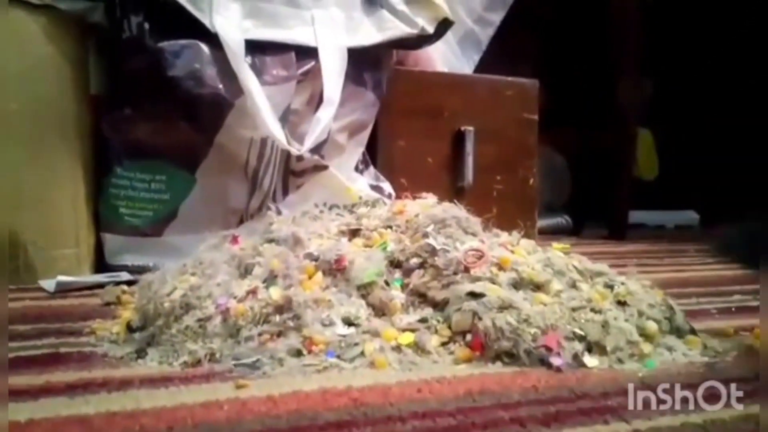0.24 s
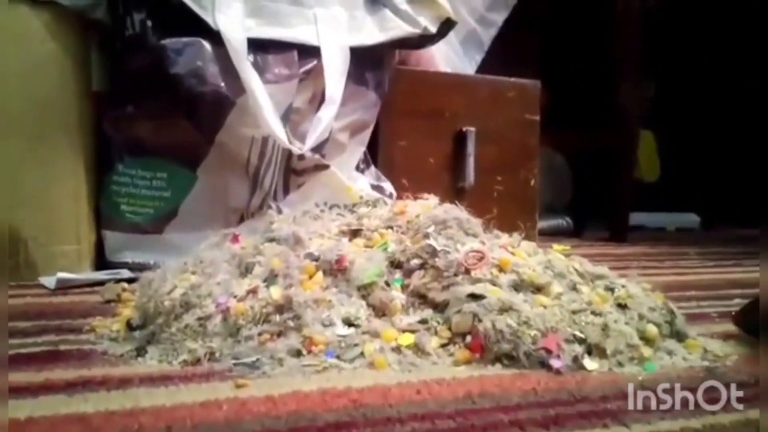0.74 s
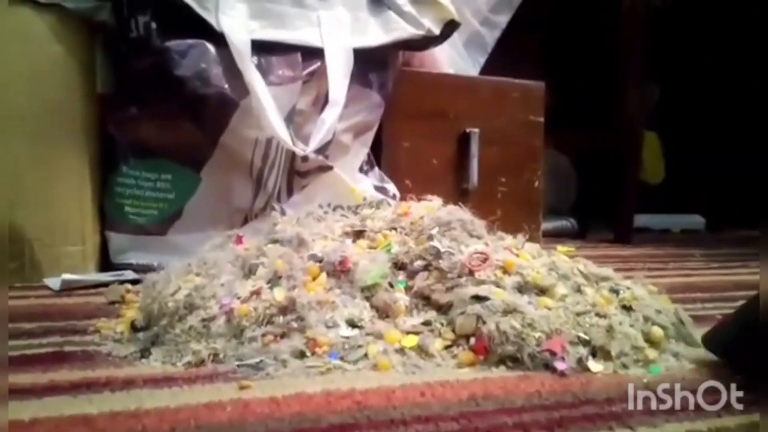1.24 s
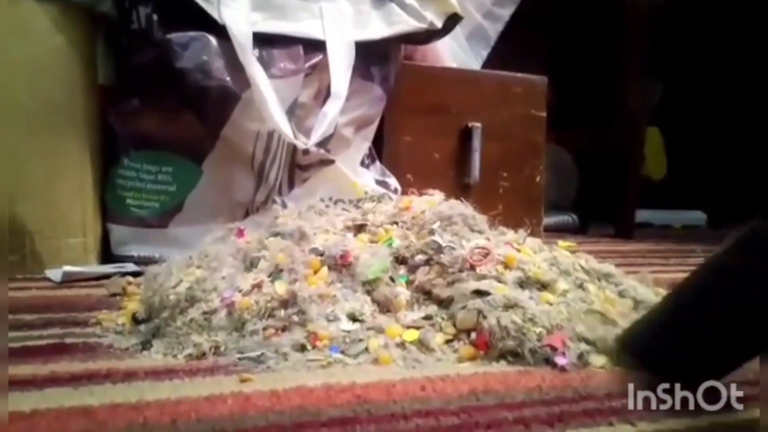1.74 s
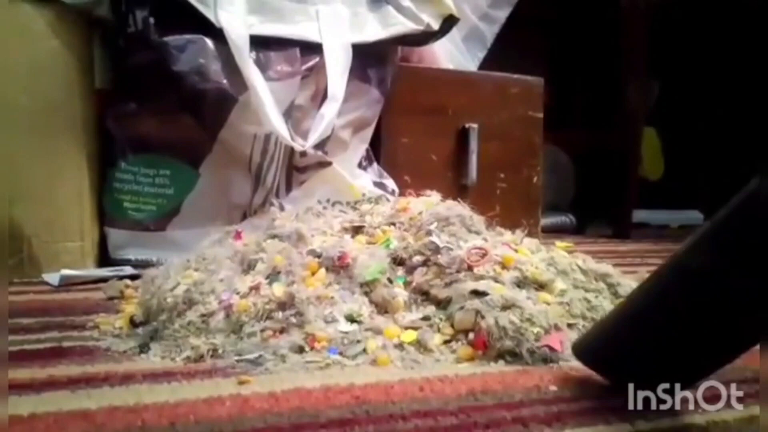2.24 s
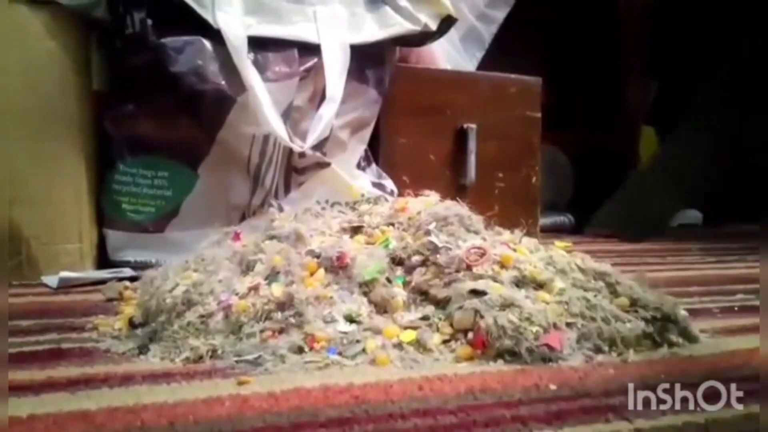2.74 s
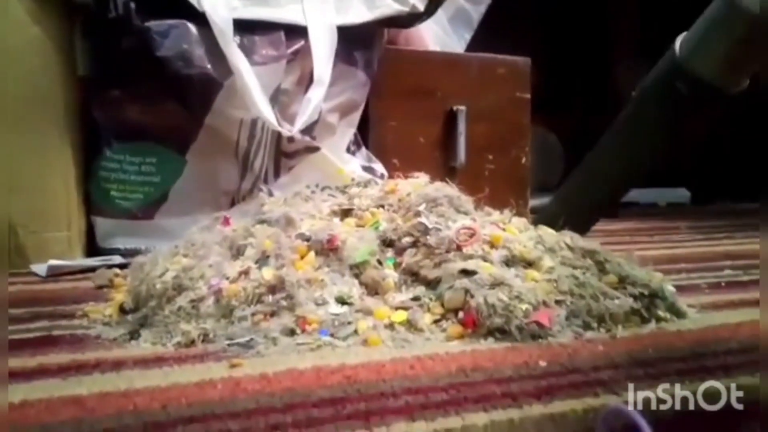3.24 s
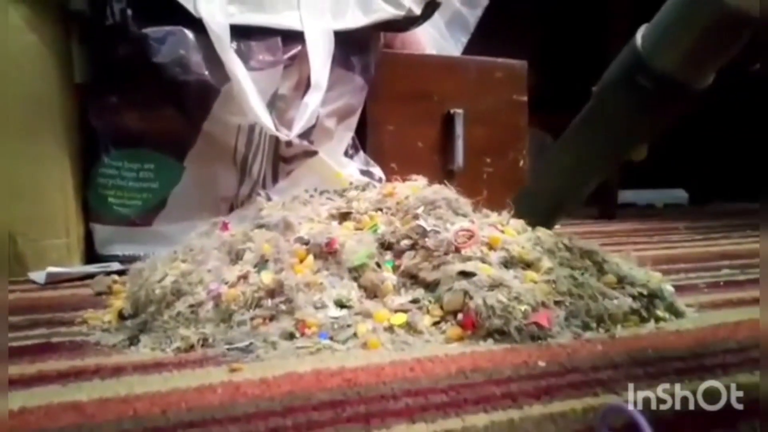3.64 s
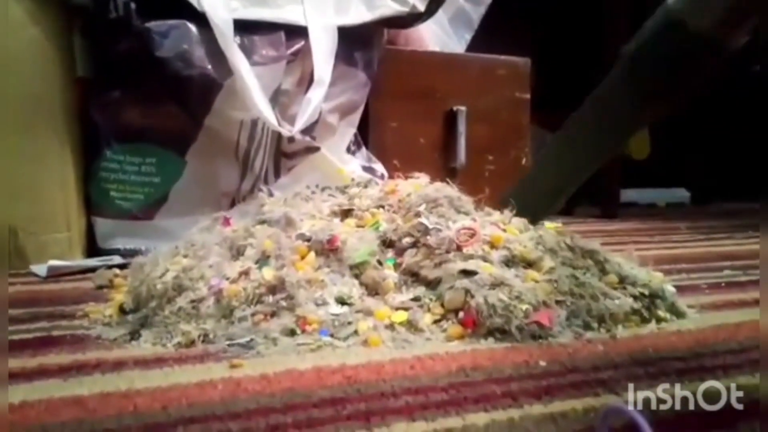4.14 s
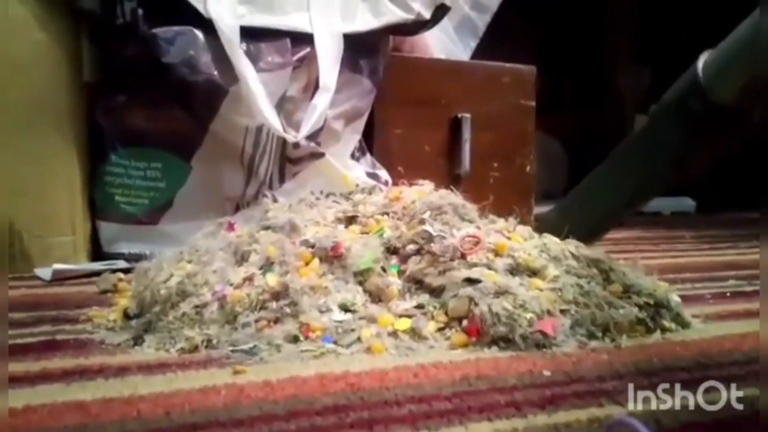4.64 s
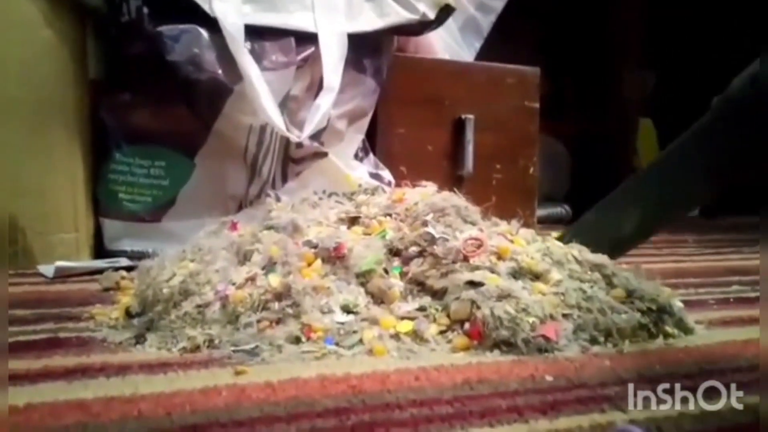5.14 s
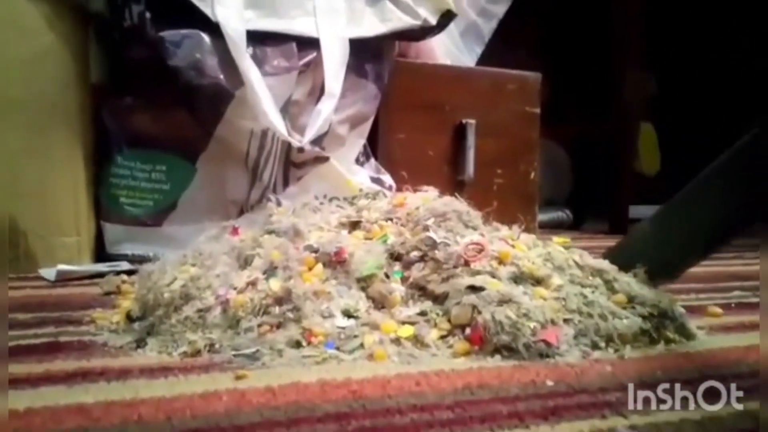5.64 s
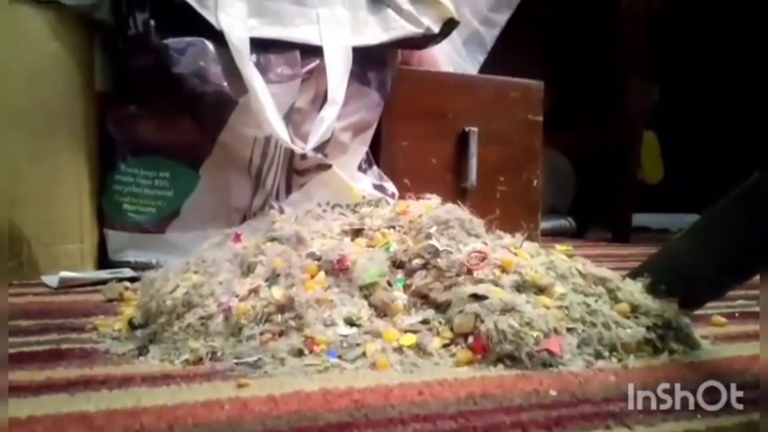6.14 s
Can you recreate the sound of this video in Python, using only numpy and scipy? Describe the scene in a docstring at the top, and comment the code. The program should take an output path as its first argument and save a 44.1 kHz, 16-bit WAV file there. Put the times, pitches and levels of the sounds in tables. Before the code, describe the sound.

A vacuum cleaner sucks debris off a carpet close up, with rushing air, fizzing grit and hard kernels rattling up the plastic wand.

```python
"""Vacuuming a carpet, close up

The wand works close by, to the right of a two-port microphone, sucking up fluff and hard kernels.
Air hums in the modes of the hose and swells as the nozzle gulps clumps. Grit fizzes and kernels tick
against the plastic wand, and lumps knock in the nozzle. Farther off, the motor hisses and whines."""
import sys
import numpy as np
from scipy import signal
from scipy.io import wavfile
from scipy.ndimage import uniform_filter1d

SR = 44100
rng = np.random.default_rng(int(sys.argv[2]) if len(sys.argv) > 2 else 0)


def generate_wav(signal):
    """Clip the signal to [-1, 1] and save it as 16-bit WAV at the path in sys.argv[1]."""
    frames = np.transpose(np.atleast_2d(signal))
    scaled = np.clip(frames, -1, 1) * 32767
    pcm = np.round(scaled).astype(np.int16)
    wavfile.write(sys.argv[1], SR, pcm)


N = 281358

# steady suction in the hose: time_s, level_db
SUCTION = [(0.0, -41), (0.15, -44), (0.7, -45.5), (1.15, -44), (1.5, -48.5), (1.7, -52.5), (2.05, -45.5),
           (2.45, -54), (2.66, -41), (2.87, -45.5), (3.67, -45.5), (4.5, -50.5), (5.05, -45), (5.45, -45),
           (5.6, -51), (5.82, -55), (6.1, -46), (6.38, -58)]
# clumps gulped by the nozzle: peak_s, fall_s, air_db, first_mode_db, second_mode_db
GULPS = [(0.0, 0.073, -50, -54, -46), (.724, 0.015, -30, -67, -38), (.952, 0.063, -43, -45, -43.5),
         (1.144, 0.043, -43, -48, -59), (1.58, 0.085, -41.5, -47, -47), (1.953, 0.031, -39, -37, -67),
         (2.272, 0.038, -41.5, -58, -68), (2.359, 0.032, -38, -43, -58), (2.489, 0.18, -35, -44, -44),
         (3.772, 0.022, -33, -29, -29), (3.893, 0.12, -43.5, -46.5, -55), (4.269, 0.024, -39.5, -49, -47),
         (4.372, 0.032, -41, -46, -55), (4.44, 0.045, -46, -39.5, -42.5), (4.489, 0.13, -43.5, -47, -47.5),
         (4.585, 0.024, -35, -39.5, -41.5), (5.155, 0.078, -71, -28.5, -41), (5.26, 0.066, -45, -48, -44),
         (6.105, 0.065, -64, -47, -72), (6.154, 0.024, -37, -65, -70), (6.251, 0.049, -45.5, -38, -44)]
# brief dips in the level of air and debris noise: centre_s, half_length_s, change_db
DIPS = [(0.649, 0.012, -9), (0.819, 0.056, -5.5), (1.235, 0.029, -2.5), (1.307, 0.01, -8),
        (1.482, 0.025, -8), (1.806, 0.043, -7), (2.035, 0.015, -6), (2.106, 0.056, -12), (2.296, 0.018, -4),
        (3.956, 0.012, -7), (4.007, 0.1, -5), (4.195, 0.039, -17), (4.307, 0.015, -6), (4.332, 0.026, -8),
        (4.605, 0.064, -3.5), (4.638, 0.012, -9), (4.727, 0.052, -5), (4.836, 0.01, -9), (5.294, 0.012, -6),
        (5.364, 0.09, -4), (5.564, 0.05, -7), (6.045, 0.015, -7), (6.199, 0.044, -8), (6.38, 0.06, -5.5)]
# upper pipe modes of the hose: mode_number, width_hz, level_db
HOSE_MODES = [(3, 66, 1), (4, 127, 1.5), (5, 36, 4.5), (6, 33, 4), (7, 36, 10.5), (8, 106, 7.5),
              (9, 33, 9.5), (10, 174, 3.5)]
# broad roar between those modes: frequency_hz, level_db
ROAR_SPECTRUM = [(25, -16), (70, -17), (140, 0), (650, -6), (1100, -18), (1600, -45)]
# a narrower nozzle gap drives the upper hose modes: time_s, upper_minus_middle_db
GAP_TILT = [(0.0, -1), (1.42, 0), (2.83, 0), (2.97, 2.5), (3.67, 1), (3.9, 13), (4.07, 1), (4.35, 1),
            (4.5, 14), (4.67, 1.5), (5.09, -1.5), (6.11, 8), (6.37, 4)]
# motor and room air: frequency_hz, level_db
HISS_SPECTRUM = [(710, -59), (1200, -1), (1650, -5.5), (1780, -7), (2290, -1), (3100, -8.5), (4400, 0),
                 (5250, 0), (5660, -1.5), (10100, -66), (16400, -67)]
# where that hiss sits at the microphone: frequency_hz, left_minus_right_db
HISS_PAN = [(60, -5), (380, -3), (2380, 3.5), (15000, -1)]
# tone of the fan blades: time_s, level_db
WHINE_LEVEL = [(0, -59), (2.8, -57), (3.1, -53.5), (3.6, -53.5), (4, -58), (6.38, -62)]
# loads of debris rushing up the wand: peak_s, fall_s, fizz_db, knock_db
LOADS = [(0.0, 0.065, -63, -36), (.668, 0.17, -38, -44.5), (.822, 0.075, -29, -39),
         (.879, 0.027, -60, -33.5), (1.053, 0.12, -37, -41), (1.17, 0.14, -43.5, -47),
         (1.279, 0.031, -48, -34), (1.345, 0.13, -37.5, -38.5), (1.7, 0.68, -35.5, -43.5),
         (1.959, 0.098, -35.5, -32), (2.07, 0.13, -33.5, -38.5), (2.198, 0.075, -37, -51),
         (2.299, 0.14, -33, -35.5), (2.45, 0.58, -41.5, -51), (3.235, 0.027, -38.5, -39),
         (3.602, 0.031, -37, -37.5), (3.772, 0.15, -36, -46), (3.83, 0.054, -31.5, -31),
         (3.902, 0.096, -30, -33.5), (3.983, 0.024, -25.5, -30), (4.06, 0.05, -35.5, -36.5),
         (4.229, 0.45, -35.5, -49), (4.374, 0.11, -32.5, -40), (4.482, 0.027, -32.5, -27.5),
         (4.575, 0.057, -34, -25.5), (4.699, 0.082, -32, -33), (4.859, 0.23, -36.5, -40.5),
         (5.246, 0.025, -59, -35.5), (5.324, 0.026, -26, -35.5), (5.364, 0.064, -25.5, -32),
         (5.514, 0.069, -39, -41.5), (5.6, 0.06, -40.5, -62), (5.836, 0.65, -36.5, -45),
         (5.952, 0.067, -31.5, -39), (6.082, 0.076, -48, -39), (6.192, 0.23, -27.5, -35.5),
         (6.256, 0.059, -30.5, -32), (6.312, 0.013, -26.5, -27.5)]
# resonances of the air in the nozzle: pitch_hz, width_hz, level_db
NOZZLE_MODES = [(1467, 80, 1), (1698, 430, 4), (1980, 190, 1), (2230, 480, -2), (2805, 1440, 0)]
# centre of the knocking, set by how deep in the tube the lumps are: time_s, pitch_hz
KNOCK_PITCH = [(0.0, 2290), (1.29, 2170), (3.25, 2230), (3.71, 1740), (3.84, 1660), (3.9, 2160),
               (4.23, 2230), (4.47, 1550), (4.61, 1760), (4.65, 2520), (5.26, 1880), (5.4, 2400),
               (6.38, 2080)]
# bright ring of the wand's wall: frequency_hz, level_db
WALL_SPECTRUM = [(1710, -29.5), (2900, -8), (3210, -16.5), (3600, -6), (4950, -6.5), (6020, -2.5),
                 (6960, -6.5), (8280, -20.5), (9430, -16), (12600, -24.5), (13600, -38.5), (16400, -52.5)]
# the loudest kernels to strike: start_s, peak_db, ring_hz, hollow_db, treble_db (brittle pieces only)
KERNELS = [(0.639, -20.5, 6300, -30, 7), (0.659, -17.5, 5500, -32, 7), (0.713, -20.5, 5500, -18),
           (.782, -23, 5700, -11), (0.874, -14, 4060, -9), (1.269, -23.5, 5200, -14, 10),
           (1.282, -22, 5000, -5), (1.3, -26, 5500, 6), (1.3135, -16.5, 5750, -25, 8),
           (1.331, -20, 5870, -7), (1.351, -20, 6170, -20), (1.647, -17, 6540, -21),
           (1.889, -21, 6500, -21), (1.925, -18, 5670, -31), (2.0798, -21, 6340, -32, 8),
           (2.087, -19, 5530, -30), (2.0936, -21.5, 5930, -28), (2.1226, -23, 6600, -31),
           (2.248, -22, 5780, -20), (2.287, -18.5, 6040, -15), (2.295, -16.5, 6100, -28),
           (2.369, -21.5, 5970, -12), (3.5878, -30, 5770, -19), (3.65, -25, 5380, -18),
           (3.739, -21, 5650, -32), (3.7697, -15, 5740, -5.5), (3.781, -15.5, 4120, -4),
           (3.807, -24, 5600, -13), (3.822, -15, 4460, -12), (3.835, -18.5, 5530, -5),
           (3.8443, -19, 6240, -20), (3.8754, -13.5, 5600, -19), (3.9612, -16.5, 5600, -29),
           (3.975, -12, 6000, -25), (4.012, -17, 6030, -17), (4.0316, -14.5, 5600, -17.5),
           (4.053, -25, 6280, -20), (4.1879, -25, 6260, -14), (4.203, -23, 5700, -23),
           (4.2205, -18, 6200, -24), (4.266, -19.5, 6300, -24), (4.351, -18, 5910, -19),
           (4.363, -14.5, 5900, -22), (4.3685, -10, 6160, -15.5), (4.399, -15, 5300, -13),
           (4.4382, -13, 5340, -7), (4.4574, -13, 5450, -12), (4.475, -16, 5460, -7),
           (4.4894, -16, 5000, -23), (4.494, -17, 5700, -15), (4.5312, -14, 6300, -25),
           (4.547, -15, 3540, -28), (4.55, -18.5, 4330, -24), (4.567, -25, 4500, 3), (4.586, -15, 6160, -2),
           (4.5952, -13.5, 4260, -20), (4.627, -13, 5670, -16), (4.6488, -11, 5140, -8.5),
           (4.6574, -10.5, 5500, -24), (4.6715, -24, 5200, -23), (4.681, -13.5, 5800, -3),
           (4.698, -7.5, 5830, -0.5), (4.7045, -11.5, 5700, -6), (4.714, -26, 5770, -15),
           (4.7304, -18.5, 5470, -30, 6), (4.7837, -15, 5640, -15), (4.793, -16, 5960, -12),
           (4.7999, -15.5, 5800, -26), (4.826, -13, 5640, -25), (4.843, -23, 6000, -2),
           (4.877, -15, 5230, -32), (4.897, -15, 6700, -34), (4.9013, -12, 6800, -36),
           (4.908, -23, 6800, -21), (4.9462, -24, 6720, -27), (5.245, -26, 5200, -11),
           (5.283, -16, 5460, -14), (5.306, -16, 4430, -18), (5.3154, -16, 4220, -34),
           (5.395, -22, 6440, -23), (5.488, -24.5, 6030, -20), (5.5533, -31, 4090, -27),
           (5.568, -29, 6100, -22), (5.5787, -14.5, 6000, -20.5), (5.588, -26, 5930, -25),
           (5.783, -19, 5300, -23), (5.8352, -19, 5660, -4.5), (5.8765, -20, 5540, -20),
           (5.9444, -14.5, 5400, -32), (5.976, -19, 6000, -20), (6.078, -18.5, 5800, -4),
           (6.093, -20, 6000, -6), (6.1226, -17, 6500, -2), (6.1565, -15.5, 6150, -27),
           (6.161, -15, 6100, -18), (6.167, -18, 6300, -20), (6.186, -21, 6000, -22, 6),
           (6.2057, -11, 5870, -21), (6.226, -24, 6060, -3), (6.2487, -16, 5300, -20),
           (6.26, -17, 6300, -19), (6.273, -20, 6600, -18), (6.3, -18, 5570, -18), (6.305, -14, 4400, -14),
           (6.317, -20, 5800, -16)]
# where the wand points: time_s, left_minus_right_db, treble_lift_db
WAND_AIM = [(0.0, -14, -5.5), (0.48, -11, -4.5), (0.67, -2.5, 0), (1.01, -5, -4), (1.17, -6, 0),
            (2.11, -9.5, 1), (3.13, -3.5, -5.5), (3.52, -1, 0), (3.69, -5.5, -1.5), (4.87, -3.5, -4),
            (5.13, -6, -9.5), (5.7, -4, -2), (6.38, -5.5, -5.5)]
# how alike turbulence is at the two ports: frequency_hz, likeness (0 to 1)
PORT_LIKENESS = [(60, 0.77), (300, 0.85), (800, 0.38), (1600, 0.62), (2600, 0.44), (4500, 0.012)]

HOSE_HZ, WAND_HZ = 106, 340  # spacing of the pipe modes
BLADE_HZ, TREBLE_CUT_HZ = 5213, 16300
WAND_LAG = 20  # samples by which the left port hears the wand later
FIRST_MODE_DB, SECOND_MODE_DB = -15.5, -11.5  # against the air, between gulps
HISS_DB, IDLE_FIZZ_DB, IDLE_KNOCK_DB = -41, -45.5, -69
DEBRIS_DIP = 0.96  # share of each dip that applies to the debris noise


def gain_of(db):
    return 10 ** (np.asarray(db) / 20)


def unit_rms(x):
    return x / np.sqrt(np.mean(x ** 2) + 1e-20)


def waver(size):
    """Random drift of rms 1, smoothed over size samples."""
    return unit_rms(uniform_filter1d(uniform_filter1d(rng.standard_normal(N), size), size))


def at_hz(table, hz):
    """A table's value at these frequencies, on a log axis."""
    points_hz, values = np.transpose(table)
    return np.interp(np.log(hz + 1), np.log(points_hz + 1), values)


def curve(table, column=1):
    """One column of a timed table, at every sample."""
    return np.interp(np.arange(N) / SR, np.transpose(table)[0], np.transpose(table)[column])


def per_frame(x, hop):
    return np.pad(x[::hop], (0, 5), "edge")[:N // hop + 5]


def panned(pair, left_minus_right_db):
    half_db = np.atleast_1d(left_minus_right_db) / 2
    return pair * gain_of([half_db, -half_db])


def modes_db(modes, hz):
    """Spectrum of steep resonances whose powers add."""
    power = sum(gain_of(2 * db) / (1 + (2 * (hz - pitch) / width) ** 2) ** 2
                for pitch, width, db in modes)
    return 10 * np.log10(power + 1e-10)


def impulse_response(spectrum_db):
    """A ring that starts at once and has this spectrum."""
    log_gain = np.log(gain_of(np.maximum(np.r_[spectrum_db, spectrum_db[-2:0:-1]], -100)))
    return np.fft.ifft(np.exp(np.conj(signal.hilbert(log_gain)))).real


def swells_db(table, column, idle_db, drop_db=-13.5, rise_share=0.68, roundness=1.18):
    """Peaks over an idle level, powers added; each has sunk by drop_db after its fall_s."""
    t = np.arange(0, N, 32) / SR
    power = gain_of(2 * (idle_db + np.zeros(N))[::32])
    for row in table:
        away = (t - row[0]) / max(row[1], .005)
        skirt_db = drop_db * np.maximum(away, -away / rise_share) ** roundness
        power += gain_of(2 * (row[column] + skirt_db))
    return np.interp(np.arange(N) / SR, t, 10 * np.log10(power))


def dips_db():
    """Brief dips in the level of air and debris noise."""
    t = np.arange(N) / SR
    return sum(db * np.clip(1 - abs(t - centre_s) / half_s, 0, 1) for centre_s, half_s, db in DIPS)


def flow_db(gulp_column=2, offset_db=0):
    """Suction, dips and gulps together; by default the level of the air itself."""
    return swells_db(GULPS, gulp_column, curve(SUCTION) + dips_db() + offset_db)


def turbulence(spectrum_db, patchy_db, flicker_db, lag, size=512, pan_db=np.zeros_like):
    """Patchy air noise, partly shared by the two ports and lag samples late on the left."""
    hop, hz = size // 4, np.fft.rfftfreq(size, 1 / SR)
    right_re, right_im, own_re, own_im, patches = rng.standard_normal((N // hop + 5, len(hz), 5)).T
    patches = uniform_filter1d(patches, size // 80 + 1, axis=0)
    patches = unit_rms(uniform_filter1d(patches, 2048 // hop + 1, axis=1))
    flicker = unit_rms(uniform_filter1d(rng.standard_normal(patches.shape[1]), 3))
    likeness = np.clip(at_hz(PORT_LIKENESS, hz), 0, 1)[:, None]
    delay = np.exp(-2j * np.pi * hz * lag / SR)[:, None]
    right = right_re + 1j * right_im
    left = likeness * delay * right + np.sqrt(1 - likeness ** 2) * (own_re + 1j * own_im)
    level_db = spectrum_db(hz[:, None]) + patchy_db * patches + flicker_db * flicker
    spectra = panned(np.array([left, right]) * gain_of(level_db), pan_db(hz[:, None]))
    pair = signal.istft(spectra, nperseg=size, noverlap=size - hop)[1][:, :N]
    return pair / np.sqrt(np.mean(pair.mean(0) ** 2))


def rush_db(hz):
    """The hose's upper modes over a broad roar, tilted about 660 Hz by the nozzle gap."""
    modes = [(number * HOSE_HZ, width_hz, db) for number, width_hz, db in HOSE_MODES]
    power = gain_of(2 * modes_db(modes, hz)) + gain_of(2 * at_hz(ROAR_SPECTRUM, hz))
    return 10 * np.log10(power) + np.tanh((hz - 660) / 60) / 2 * per_frame(curve(GAP_TILT), hop=512)


def hum(hz, wander_hz, swell_db, size):
    """One low pipe mode, unsteady in pitch and strength, 11 samples late at the left port."""
    turns = np.cumsum(hz + wander_hz * waver(2 * size)) / SR
    port_phase = [[-2 * np.pi * hz * 11 / SR], [0]]
    return np.sqrt(2) * gain_of(swell_db * waver(size)) * np.sin(2 * np.pi * turns + port_phase)


def hose():
    """Air flow excites the pipe modes; the two lowest swell on their own when the nozzle gulps."""
    rush = turbulence(rush_db, patchy_db=3.25, flicker_db=0.8, lag=10.5, size=2048,
                      pan_db=lambda hz: -3.5 * np.clip(hz / 700, 0, 1))
    rush /= np.sqrt(uniform_filter1d(rush.mean(0) ** 2, 3000))
    puff_band = signal.butter(2, [110, 200], "band", fs=SR)  # loose air in a gulp
    puff = unit_rms(signal.lfilter(*puff_band, rng.standard_normal(N)))
    first = hum(HOSE_HZ, wander_hz=5.9, swell_db=3.9, size=350) + gain_of(-5) * puff
    second = hum(2 * HOSE_HZ, wander_hz=14, swell_db=3, size=400)
    first *= gain_of(flow_db(gulp_column=3, offset_db=FIRST_MODE_DB))
    second *= gain_of(flow_db(gulp_column=4, offset_db=SECOND_MODE_DB))
    low_cut = signal.butter(2, 55, "high", fs=SR)  # the hum carries little below its first mode
    return gain_of(flow_db()) * rush + signal.lfilter(*low_cut, first + second)


def motor():
    """Farther off: wide hiss that sinks with the air's level, and a wavering blade tone to the left."""
    hiss = turbulence(lambda hz: at_hz(HISS_SPECTRUM, hz), patchy_db=2.5, flicker_db=1.2, lag=16,
                      pan_db=lambda hz: at_hz(HISS_PAN, hz))
    sag_db = 2.94 * np.minimum(flow_db() + 44, 0)
    turns = np.cumsum(BLADE_HZ + 2.5 * waver(3000)) / SR
    whine = np.sqrt(2) * gain_of(curve(WHINE_LEVEL) + 1.5 * waver(2500)) * np.sin(2 * np.pi * turns)
    return gain_of(HISS_DB + sag_db) * hiss + whine * gain_of([[3], [-4]])


def knocks():
    """Lumps clatter in the nozzle air; their place in the tube picks which modes sound."""
    def spectrum_db(hz):
        depth_db = -12 * np.log10(1 + ((hz - per_frame(curve(KNOCK_PITCH), hop=256)) / 300) ** 2)
        comb_db = 6 * np.cos(2 * np.pi * hz / HOSE_HZ)  # the hose modes carry on up here
        return modes_db(NOZZLE_MODES, hz) + depth_db + comb_db

    clatter = turbulence(spectrum_db, patchy_db=5.5, flicker_db=0.09, lag=15, size=1024)
    bumps = 1. * (rng.random(N) < 200 / SR)
    clatter *= 1.75 + unit_rms(uniform_filter1d(bumps, 160))
    clatter /= np.sqrt(uniform_filter1d(clatter.mean(0) ** 2, 2000))
    level_db = swells_db(LOADS, column=3, idle_db=IDLE_KNOCK_DB) + DEBRIS_DIP * dips_db()
    return gain_of(level_db) * panned(clatter, -.8)


def tick(ring_hz, hollow_db, crack_s, depth_hz, treble_db=0):
    """One blow: a short crack rings the wall and the nozzle air, not quite alike at the two ports."""
    hz, t = np.fft.rfftfreq(1024, 1 / SR), np.arange(700) / SR
    ring_db = 9 / (1 + ((hz - ring_hz) / 350) ** 2) - 9
    top_db = (treble_db + rng.uniform(-7, -2.5)) * (hz > 8000)
    wall = impulse_response(at_hz(WALL_SPECTRUM, hz) + ring_db + top_db)[:300]
    depth_db = 14 / (1 + ((hz - depth_hz) / 150) ** 2)
    hollow = impulse_response(modes_db(NOZZLE_MODES, hz) + depth_db)[:300]
    body = wall / abs(wall).max() + gain_of(hollow_db) * hollow / abs(hollow).max()
    rise = np.sin(np.pi / 2 * np.clip(t / .0012, 0, 1)) ** 2  # the piece scrapes as it lands
    fall = gain_of(-60 * (t / crack_s) ** 2) + gain_of(-25 - 60 * t / .05)
    snap = 1 + 2.1 * np.exp(-((t - .0012) / .0002) ** 2)  # the hardest moment of contact
    right, unshared = rng.standard_normal((2, len(t))) * rise * fall * snap
    left = np.r_[np.zeros(WAND_LAG), (.45 * right + .85 * unshared)[:-WAND_LAG]]
    pair = signal.fftconvolve([left, right], body[None], axes=1)
    return pair / abs(pair.mean(0)).max()


def grit(per_s, spread_db, hollow_db):
    """Small pieces of ten kinds and unlike sizes hit the wall at random moments."""
    hits = gain_of(spread_db * np.minimum(rng.exponential(1, N), 5)) * (rng.random(N) < per_s / SR)
    kinds = rng.integers(0, 10, N)
    pair = np.zeros((2, N))
    for kind in range(10):
        blow = tick(rng.uniform(3160, 6800), hollow_db, crack_s=0.0025, depth_hz=rng.uniform(1530, 2040))
        pair += signal.oaconvolve((hits * (kinds == kind))[None], blow, axes=1)[:, :N]
    return pair / np.std(pair.mean(0))


def fizz():
    """Dense grit pelts the wall over the hiss of the narrowed nozzle."""
    slide = per_frame(waver(1500), hop=128)  # debris shifts the wand's pipe modes

    def spectrum_db(hz):
        comb_db = 7.5 * np.cos(2 * np.pi * hz / WAND_HZ + 1.5 * slide) - 3
        return at_hz(WALL_SPECTRUM, hz) + comb_db * (hz < 7500)

    hiss = turbulence(spectrum_db, patchy_db=3.5, flicker_db=2.2, lag=WAND_LAG)
    level_db = swells_db(LOADS, column=2, idle_db=IDLE_FIZZ_DB)
    loaded = np.clip((level_db - IDLE_FIZZ_DB) / 8, 0, 1)  # no grit while the wand draws clean air
    gain = gain_of(level_db + DEBRIS_DIP * dips_db() + 1.5 * loaded * waver(250))
    return gain * (0.47 * loaded * grit(per_s=500, spread_db=2.6, hollow_db=-15) + 0.8 * hiss)


def kernels():
    """Hard pieces strike the wand one by one."""
    pair = np.zeros((2, N + 1000))
    for start_s, peak_db, ring_hz, hollow_db, *treble_db in KERNELS:
        crack_s = 0.0105 * gain_of(rng.uniform(-1.2, 3.1))
        depth_hz = np.interp(start_s, *np.transpose(KNOCK_PITCH))
        at = round(start_s * SR)
        pair[:, at:at + 999] += gain_of(peak_db) * tick(ring_hz, hollow_db, crack_s, depth_hz, *treble_db)
    return pair[:, :N]


def scene():
    """The wand swings about close on the right, over the hose, motor and knocking."""
    wand = panned(fizz() + kernels(), curve(WAND_AIM))
    treble = signal.oaconvolve(wand, signal.firwin(101, 8300, pass_zero=False, fs=SR)[None], "same")
    beam = gain_of(curve(WAND_AIM, column=2))  # the highest treble beams out of the nozzle
    left, right = wand + (beam - 1) * treble
    shadowed = signal.lfilter([.68, .32], [1], left)  # the body dulls the far port
    return hose() + motor() + knocks() + np.array([shadowed, right])


def record(dry):
    """Treble cut off above 16.3 kHz."""
    low_pass = signal.firwin(511, TREBLE_CUT_HZ, window=("kaiser", 9), fs=SR)
    return signal.oaconvolve(dry, low_pass[None], "same")


dry = scene()
out = record(dry)
generate_wav(out)
```